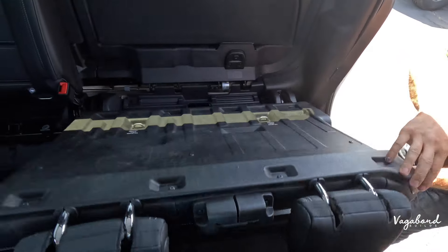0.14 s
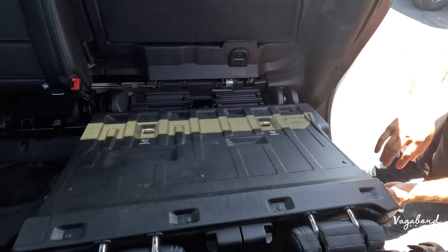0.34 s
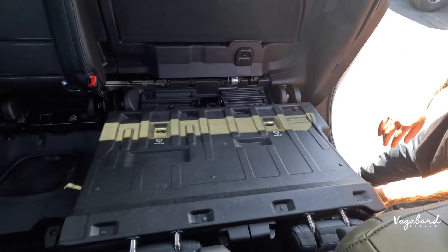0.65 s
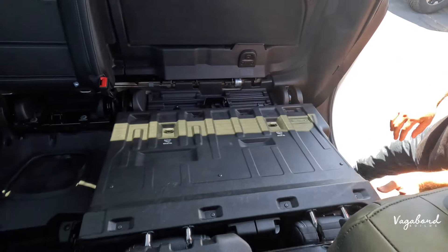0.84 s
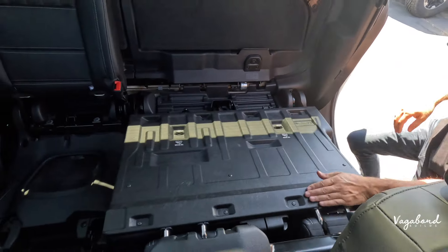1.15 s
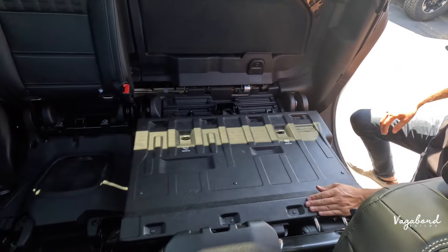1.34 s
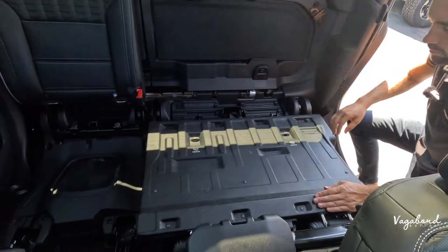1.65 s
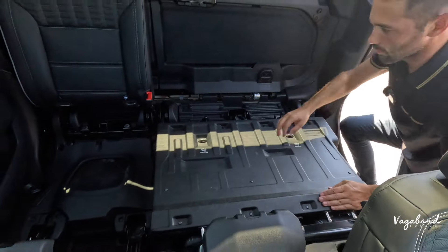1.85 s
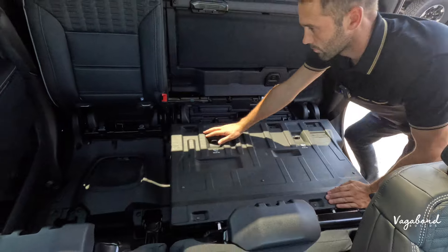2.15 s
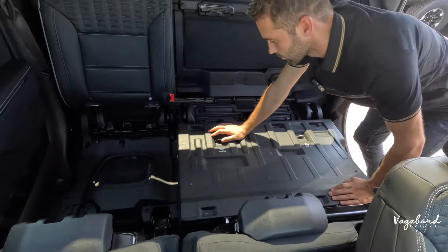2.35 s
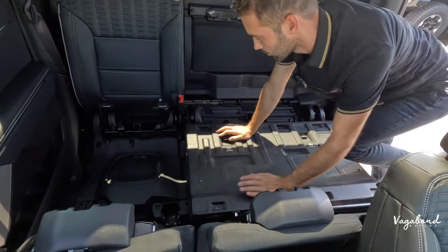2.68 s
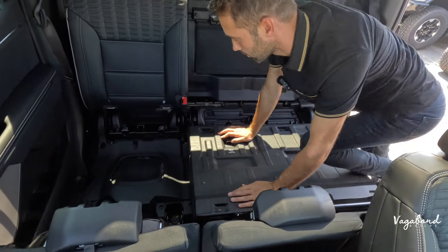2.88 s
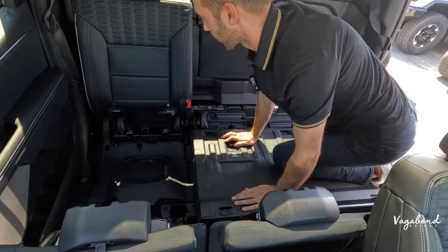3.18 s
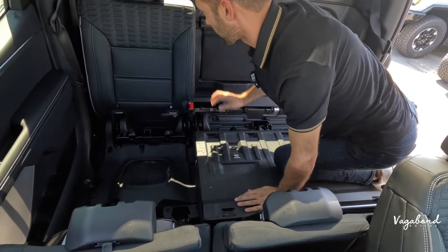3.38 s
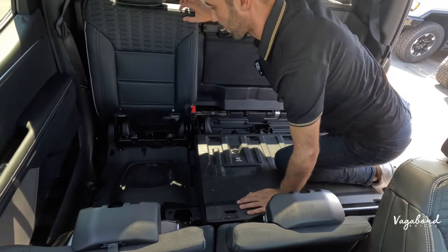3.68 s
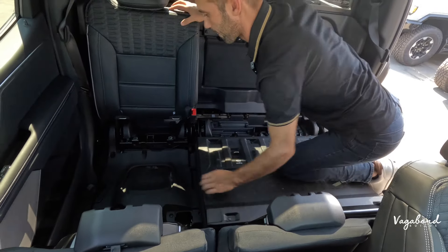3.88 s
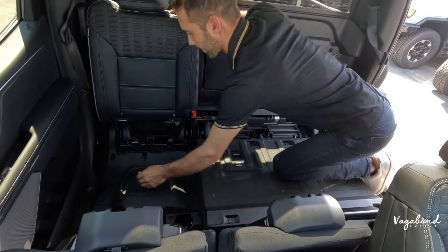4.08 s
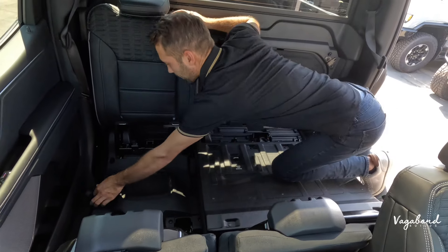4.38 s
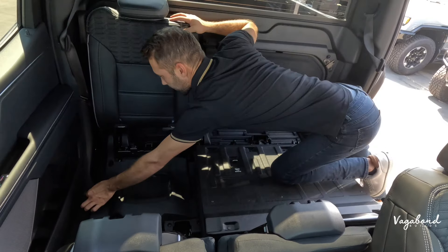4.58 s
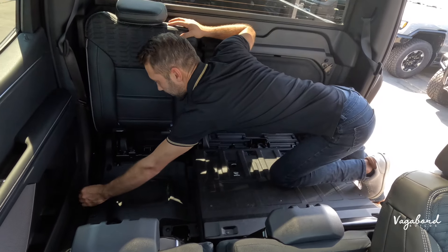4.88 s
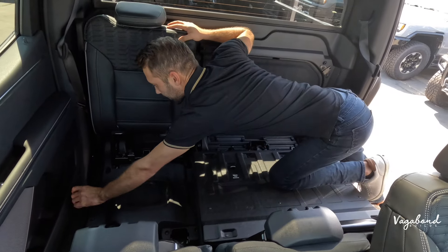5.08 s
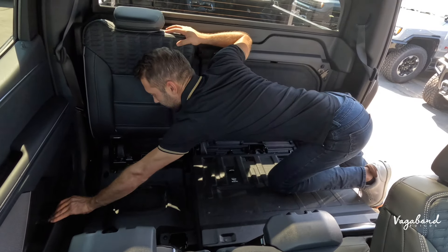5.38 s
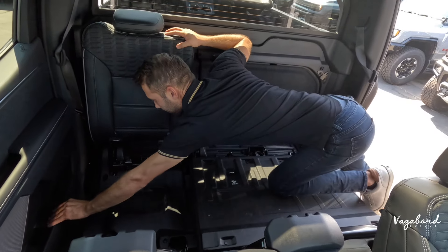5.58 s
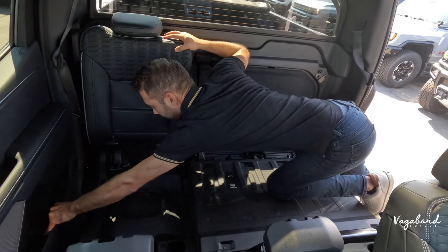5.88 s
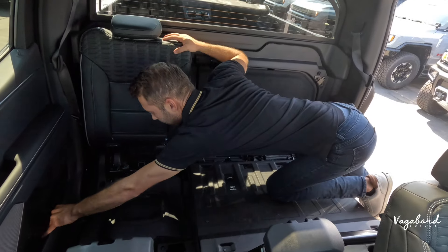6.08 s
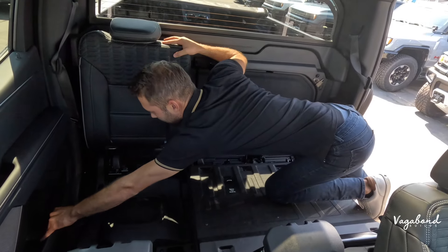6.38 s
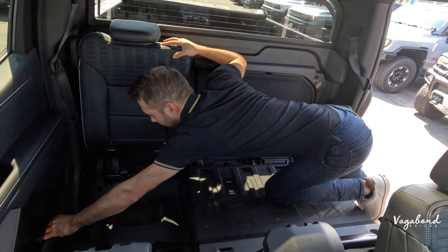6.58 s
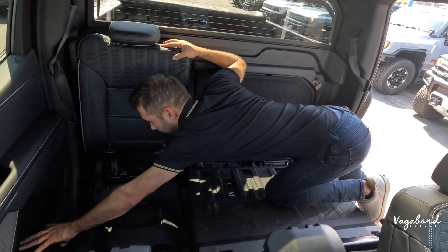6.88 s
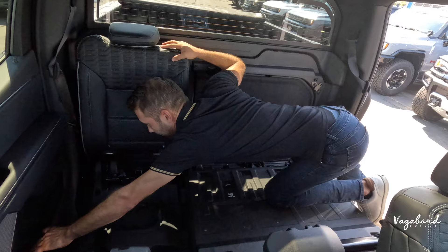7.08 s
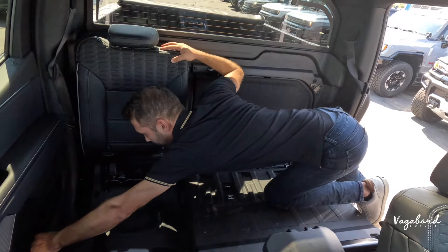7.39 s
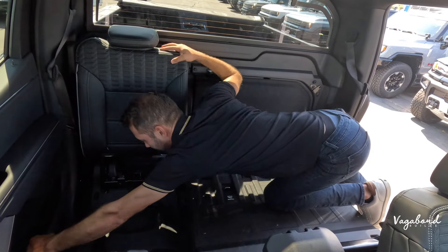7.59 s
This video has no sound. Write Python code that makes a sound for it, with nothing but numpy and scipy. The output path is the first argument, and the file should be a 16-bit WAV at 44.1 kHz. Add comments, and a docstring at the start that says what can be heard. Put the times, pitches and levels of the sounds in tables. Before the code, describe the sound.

A close, dry, nearly mono scene in a small padded truck cab, with a very faint outdoor hush and machinery drone through an open door. From 0 to 0.6 s, airy brushing, small clicks and soft panel thuds; then near quiet until a sharp knock at 1.1 s with light taps behind it. A heavier, humming thump lands at 1.6 s and another at 2.2. A bright scrape and crisp snap come around 2.5, followed by knocks and a deep soft boom near 3.1. Hollow thumps and cloth rustle continue to 4.3 s, then mostly quiet until 5.2. From 5.4 to 6.5 s, dense hollow knocking, plastic clacks and rattling clips. Short rubbing creaks at 6.6 to 6.8 lead to a hard clattering blow at 6.9, a strong knock at 7.27, and final thumps with rustling to about 7.7.

```python
"""Brushing, thumps, snaps and clatter, as a folding rear seat is laid flat and climbed on in a parked truck cab.
Hands and knees thump the seat back: panel, frame and trim modes, band-limited around each blow's pitch.
Upholstery and clothes brush over plastic: noise made of uneven slips; latch parts snap and loose parts rattle.
The small padded cab answers briefly; a faint outdoor hush and drone come through one open door. Almost mono."""
import sys
import numpy as np
from scipy import signal
from scipy.fft import rfft, irfft
from scipy.io import wavfile
from scipy.ndimage import uniform_filter1d

SR = 44100
rng = np.random.default_rng(int(sys.argv[2]) if len(sys.argv) > 2 else 0)


def to_wav(sig):
    """Store sig (one row per channel, or 1-D mono) as 16-bit WAV at the path in sys.argv[1].

    Samples outside -1..1 are clipped; the rate is SR.
    """
    pcm = np.clip(np.atleast_2d(sig), -1, 1) * 32767
    pcm = np.round(pcm).astype(np.int16)
    wavfile.write(sys.argv[1], SR, pcm.T)  # frames by channels


N = 341334
TIME_S = np.arange(N) / SR
RING_S = np.arange(SR // 4) / SR  # time since a blow
TOP_HZ = 15900

# blows on seat back and trim: (time [s], panel level before trim [dB], panel pitch [Hz], settling time [s],
# frame thud level before trim [dB], contact clack level [dB], clack pitch [Hz])
BLOWS = [(0.264, -32, 277, 0.48, -36, -61, 1000), (0.36, -36, 300, 0.28, -37.5, -57, 1000),
         (0.539, -49, 332, 0.14, -45.5, -66, 1200), (1.12, -25.5, 567, 0.12, -44, -33, 1380),
         (1.127, -29.5, 304, 0.25, -42, -37.5, 1930), (1.228, -45, 520, .07, -57, -54, 1640),
         (1.26, -45, 520, 0.048, -55, -65, 1400), (1.282, -37.5, 524, 0.099, -37.5, -37.5, 1370),
         (1.302, -34.5, 556, 0.09, -45, -58, 1390), (1.322, -35, 519, 0.089, -41, -51, 1480),
         (1.338, -34, 396, 0.37, -41, -54, 1570), (1.404, -42.5, 332, 0.17, -39.5, -53, 1400),
         (1.609, -28, 483, 0.11, -33, -38.5, 1790), (1.626, -23.5, 320, .2, -33, -48.5, 1720),
         (1.687, -37.5, 523, 0.21, -30.5, -61, 900), (1.762, -40, 574, 0.064, -43, -47, 1290),
         (1.789, -48, 523.7, 0.038, -66, -53, 1290), (2.008, -36, 215, 0.16, -38.5, -47.5, 2400),
         (2.181, -23, 305, 0.1, -25, -54, 1760), (2.211, -32.5, 353, 0.25, -34, -38, 1850),
         (2.519, -30.5, 366, 0.071, -43.5, -58, 990), (2.76, -32, 348, 0.23, -42, -43.5, 1520),
         (2.797, -51, 400, .04, -59, -44.5, 1490), (2.817, -38.5, 250, 0.049, -41, -69, 1000),
         (2.895, -29, 336, 0.13, -43, -52, 1350), (2.922, -31, 306, 0.21, -41, -52, 1500),
         (2.953, -37, 396, 0.053, -52, -48, 1720), (3.129, -23, 378, 0.2, -32, -32.5, 1560),
         (3.16, -31.5, 430, 0.081, -42, -37, 1695), (3.548, -38, 350, 0.2, -45, -62, 1490),
         (3.586, -40.5, 520, 0.09, -62, -47.5, 1340), (3.661, -42, 623, 0.22, -51, -57, 1300),
         (3.689, -45.5, 600, 0.16, -60, -40.5, 2130), (3.761, -33, 500, 0.16, -36.5, -40, 1800),
         (3.903, -29, 375, 0.34, -33, -53, 1190), (3.924, -24, 340, 0.049, -38.5, -35, 1410),
         (4.218, -32.5, 416, 0.16, -51, -43, 1330), (4.313, -48, 345, 0.023, -55.5, -39, 1770),
         (4.462, -35, 303, 0.1, -41, -72, 890), (4.529, -42.5, 253, 0.0547, -48.5, -56, 1410),
         (5.177, -46, 378, 0.134, -53.5, -80, 900), (5.346, -38, 237, 0.13, -31.5, -63.5, 1010),
         (5.43, -36, 503, 0.85, -47, -43.5, 1380), (5.471, -27.5, 553, 0.091, -44, -23.5, 1340),
         (5.48, -24.5, 404, 0.063, -42, -30.5, 1940), (5.628, -26, 653, 0.55, -36, -39.5, 1130),
         (5.669, -25, 530, 0.035, -34, -36, 1387), (5.686, -19.5, 416, 0.03, -25.5, -36.5, 1390),
         (5.745, -34, 363, 0.21, -31, -43, 2030), (5.81, -33.5, 434, 0.23, -38.5, -48, 1490),
         (5.908, -21, 435, 0.14, -40, -79, 900), (5.938, -32, 507, 0.088, -48, -68, 900),
         (5.965, -32.5, 534, 0.12, -58, -54, 910), (6.082, -30, 503, 0.12, -61, -44.5, 1210),
         (6.123, -24, 440, 0.12, -51, -25.5, 1280), (6.133, -22, 440, 0.11, -34, -31, 1280),
         (6.174, -33, 482, 0.057, -40, -38, 1500), (6.183, -22.5, 330, 0.18, -35, -49, 1370),
         (6.229, -25.5, 340, 0.047, -28.5, -44, 1380), (6.244, -25.5, 378, 0.036, -37, -46, 1500),
         (6.297, -28.5, 362, 0.28, -37.5, -47, 1400), (6.323, -29, 425, 0.12, -36, -42, 1500),
         (6.349, -25, 420, 0.088, -32, -38, 1440), (6.365, -28, 376, 0.069, -31, -59, 1190),
         (6.459, -28.5, 372, 0.074, -39.5, -41, 1500), (6.468, -20.5, 360, 0.068, -29, -39.5, 1490),
         (6.486, -33, 292, 0.17, -34, -46, 1630), (6.58, -36.5, 495, 0.37, -60, -66, 910),
         (6.871, -22, 440, 0.35, -27, -30, 1000), (6.896, -16, 500, 0.071, -39, -31, 1450),
         (6.909, -15, 550, 0.028, -34, -22, 1680), (6.917, -38, 560, 0.037, -49, -22.5, 1360),
         (6.943, -36.5, 565, 0.34, -42, -57, 1200), (7.015, -34.5, 308, 0.053, -40.5, -48, 1110),
         (7.066, -34, 616, 0.082, -64, -75, 910), (7.209, -27.5, 474, 0.15, -32.5, -46.5, 1130),
         (7.267, -11, 570, 0.037, -26.5, -30.5, 1210), (7.278, -21, 503, 0.08, -28, -41, 1530),
         (7.394, -20.5, 425, 0.09, -33.5, -41, 1290), (7.57, -24.5, 330, 0.11, -35, -34, 1250),
         (7.591, -40.5, 396, 0.11, -51, -40.5, 1320)]
# modes of the latch parts: (frequency [Hz], level [dB])
LATCH_MODES = [(2330, 13), (2600, 8), (2857, 8), (3227, 5.5), (3396, 7), (3700, 0), (3950, 1), (4350, -11),
               (4567, -9.5), (5000, -16), (6215, -26), (6690, -8.5), (7200, 4.5), (8170, 3), (8380, -8),
               (9800, 4.5)]
# rustle of clothes: (time [s], level before trims [dB])
RUSTLE_LEVEL = [(0.0, -53), (0.21, -53.5), (0.95, -55.5), (1.55, -51), (1.7, -58.5), (1.85, -55),
                (2.4, -54), (2.68, -62), (3.02, -54.5), (3.23, -47.5), (3.36, -52.5), (3.52, -61),
                (3.72, -51), (3.8, -44), (4.98, -67), (5.37, -67), (5.53, -45), (5.6, -62), (5.85, -50.5),
                (6.02, -58), (6.2, -44), (6.42, -63.5), (6.5, -54), (6.62, -56.5), (6.85, -59),
                (6.98, -61.5), (7.3, -51.5), (7.45, -56.5), (7.61, -50), (7.645, -44.5), (7.69, -50),
                (7.74, -43)]


def undb(db):
    """Decibels to gain."""
    return 10 ** (np.asarray(db) / 20)


def unit(x):
    """Scale to rms 1."""
    return x / np.sqrt(np.mean(x ** 2) + 1e-20)


def blow_level(x, db):
    """Give a short sound the energy of 20 ms at this rms level."""
    return x * undb(db) * np.sqrt(0.02 * SR / np.sum(x ** 2))


def fade(t60_s):
    """Exponential decay after a blow, 60 dB in t60_s."""
    return np.exp(-np.log(1000) * RING_S / max(t60_s, 1e-3))


def press(contact_s):
    """Force builds over the time that a contact takes."""
    contact_s = max(contact_s, 1e-5)
    force = np.ones(len(RING_S))
    t = RING_S[:int(5 * contact_s * SR) + 1]
    force[:len(t)] -= np.exp(-(t / contact_s) ** 2)
    return force


def band(x, low_hz, high_hz, order=2):
    """Causal band-pass."""
    high_hz = np.clip(high_hz, 50, 0.45 * SR)
    low_hz = np.clip(low_hz, 10, 0.96 * high_hz)
    return signal.sosfilt(signal.butter(order, [low_hz, high_hz], "band", fs=SR, output="sos"), x)


def colour(x, points):
    """Shape a long sound's spectrum by (Hz, dB) points; rms 1."""
    hz, db = np.transpose(points)
    f = np.maximum(np.arange(N // 2 + 1) * SR / N, 1)
    gain = undb(np.interp(np.log(f), np.log(hz), db))
    return unit(irfft(rfft(x) * gain, N))


def curve(rows):
    """(s, dB) rows as gain over time."""
    return undb(np.interp(TIME_S, *np.transpose(rows)))


def walk(rate_hz):
    """Smooth random wander, rms 1."""
    k = max(int(SR / rate_hz), 1)
    steps = np.repeat(rng.standard_normal(N // k + 1), k)
    return unit(uniform_filter1d(steps, k)[:N])


def add(out, s, x):
    """Mix x into out from time s on."""
    i = int(np.clip(s * SR, 0, N - 1))
    out[i:i + len(x)] += x[:N - i]


def friction(grain_db, jerk_db, jerk_rate_hz):
    """Countless tiny slips of uneven size, coming in jerks."""
    slips = rng.standard_normal(N) * undb(grain_db * rng.exponential(size=N))
    return unit(slips * undb(jerk_db * walk(jerk_rate_hz)))


def cupped(x, gap_s=0.000604, wander=0.5):
    """Gaps under a moving hand give very short echoes of changing delay, so the colour shifts in patches."""
    out = x
    for _ in range(4):
        at = np.arange(N) - gap_s * SR * np.exp(wander * walk(35))
        out = out + 0.3 * walk(25) * np.interp(at, np.arange(N), x)
    return unit(out)


def struck(modes, t60_s, chatter_db, contact_s, detune=0.017):
    """A part rings in its modes, a little differently at each spot, while loose joints chatter along."""
    hz, db = np.transpose(modes)
    t = RING_S[:int(np.clip(1.5 * t60_s * SR, 500, len(RING_S)))]
    hz = hz * (1 + detune * rng.standard_normal(len(hz)))
    size = undb(db) * rng.choice([-1, 1], len(hz))
    waves = np.sin(np.outer(np.float32(2 * np.pi * hz), np.float32(t)))
    out = undb(chatter_db) * rng.standard_normal(len(RING_S))
    out[:len(t)] += unit(size.astype(np.float32) @ waves)
    return out * fade(t60_s) * press(contact_s)


def bouncing(modes, t60_s, settle_s, delays_s, chatter_db, contact_s):
    """A part struck once per delay, weaker by 60 dB for each settling time elapsed."""
    out = np.zeros(len(RING_S))
    for after_s in delays_s:
        i = int(np.clip(after_s * SR, 0, len(RING_S) - 1))
        size = np.exp(-np.log(1000) * after_s / max(settle_s, 1e-3))
        out[i:] += size * struck(modes, t60_s, chatter_db, contact_s)[:len(RING_S) - i]
    return out


def spot(x, shortest_s=0.0003, longest_s=0.0011, reflection=0.43):
    """The nearest rim sends a blow back after a short delay, so each spot favours its own resonances."""
    lag = max(int(SR * rng.uniform(shortest_s, longest_s)), 1)
    back = np.zeros(lag + 1)
    back[0] = 1
    back[lag] = min(reflection, 0.8) * rng.choice([-1, 1])
    return signal.lfilter([1], back, x)


def tick(hz, width, t60_s):
    """A small part touches once and rings around one pitch; width is a share of the pitch."""
    size = int(0.03 * SR)
    peak = signal.iirpeak(min(hz, 0.4 * SR), 1 / width, fs=SR)
    burst = rng.standard_normal(size) * fade(t60_s)[:size]
    return signal.lfilter(*peak, signal.lfilter(*peak, burst))


def crack(t60_s, later_slips=2, slip_delay_s=0.0035, slip_db=-1):
    """A catch lets go with a dry burst, and slips twice more within a few milliseconds."""
    burst = fade(t60_s) * press(contact_s=0.0012)
    force = burst.copy()
    for after_s in slip_delay_s * rng.uniform(0.64, 1.3, later_slips):
        force += undb(slip_db) * np.interp(RING_S - after_s, RING_S, burst, left=0)
    return force * rng.standard_normal(len(RING_S))


def outside(hush_db=-64.5):
    """Distant hush (shaped noise) and machinery drone (narrow noise bands) through the open door."""
    # hush spectrum: (frequency [Hz], relative level [dB])
    hush_colour = [(25, -20.5), (60, -10.5), (125, -2.5), (200, -24.5), (290, -3), (440, -1.5), (620, -2.5),
                   (790, -19), (1000, -13), (1600, -14.5), (3000, -18.5), (6000, -35.5), (10000, -34.5),
                   (16000, -53)]
    # machinery drone: (centre [Hz], width [Hz], level [dB])
    drone_bands = [(290.5, 12.4, -66), (783, 27, -69.5)]
    swell = undb(0.7 * walk(3))
    out = undb(hush_db) * colour(rng.standard_normal(N), hush_colour)
    for hz, width_hz, db in drone_bands:
        out += undb(db) * unit(band(rng.standard_normal(N), hz - width_hz / 2, hz + width_hz / 2))
    return out * swell


def movement(rustle_trim_db=-3, shifting_trim_db=-4, sway_db=-10.5, sway_rise_s=0.035, sway_fall_s=0.042):
    """Clothes rustle and the seat rubs softly under a moving body, more so as it sways after each thud."""
    # spectra: (frequency [Hz], relative level [dB])
    rustle_colour = [(800, 16), (1400, 7), (3000, 5), (5000, 0), (7500, -2), (10000, -11.5), (13000, -11),
                     (16000, -32)]
    shifting_colour = [(30, -33), (60, -8.5), (120, 0.5), (280, 5), (420, 1), (620, -5), (790, 0),
                       (1000, -15), (1700, -14.5), (3000, -54)]
    # low rubbing of a body on the seat: (time [s], level before trim [dB])
    shifting_level = [(0.0, -91), (1.12, -52), (1.29, -33.5), (1.46, -51.5), (1.89, -42), (2.76, -51.5),
                      (2.98, -44), (3.41, -67), (3.9, -57), (4.16, -46), (4.98, -55.5), (5.39, -71),
                      (5.54, -37), (5.78, -56), (6.01, -49), (6.32, -47), (6.7, -44.5), (7.74, -42.5)]
    rustle = colour(friction(grain_db=1.5, jerk_db=1.5, jerk_rate_hz=40), rustle_colour)
    rubbing = colour(friction(grain_db=2, jerk_db=1.8, jerk_rate_hz=35), shifting_colour)
    sway = np.zeros(N)
    sway_shape = press(sway_rise_s) * np.exp(-RING_S / sway_fall_s)
    for s, _, _, _, thud_db, _, _ in BLOWS:
        add(sway, s, undb(thud_db + sway_db) * sway_shape)
    rub_level = np.hypot(undb(shifting_trim_db) * curve(shifting_level), sway)
    return undb(rustle_trim_db) * curve(RUSTLE_LEVEL) * rustle + rub_level * rubbing


def crinkles(width=0.7, t60_s=0.008, count=420, quietest_db=-18.5, mean_rise_db=3.5, low_hz=2470, high_hz=9100):
    """Creases in cloth and upholstery tick at random moments, following the rustle level."""
    out = np.zeros(N)
    for when, pitch, size in rng.random((count, 3)):
        hz = low_hz * (high_hz / low_hz) ** pitch
        db = quietest_db - mean_rise_db * np.log(1 - size)  # level against the rustle
        add(out, when * N / SR, blow_level(tick(hz, width, t60_s), db))
    return out * curve(RUSTLE_LEVEL)


def drags(trim_db=1, slip_scatter_db=3, smooth_db=-24, echo_gain=0.31, echo_cycles=4.06):
    """Slips of uneven size feed one gliding resonance with a short echo that glides along."""
    # parts dragged under pressure, and two deep soft booms at 3.1 and 4.2 s: (start [s], end [s],
    # level before trim [dB], start pitch [Hz], end pitch [Hz], width [Hz], slip rate [1/s])
    drag_rows = [(-.03, 0.09, -43.5, 7700, 8510, 3050, 3300), (0.08, 0.15, -43.5, 7200, 8350, 3200, 1700),
                 (0.164, 0.197, -34.5, 6950, 6300, 1500, 930), (0.167, 0.324, -52, 7300, 5400, 3800, 460),
                 (0.217, 0.277, -51.5, 3800, 3320, 1300, 370), (0.338, 0.469, -40.5, 5600, 4730, 2300, 520),
                 (1.008, 1.146, -55, 1410, 1860, 700, 510), (1.29, 1.36, -53, 3100, 2850, 1200, 94),
                 (1.337, 1.53, -55.5, 1630, 1400, 700, 280), (1.779, 1.932, -54, 7340, 6300, 2600, 350),
                 (1.996, 2.15, -56.5, 3580, 4340, 1500, 340), (2.324, 2.35, -48.5, 5040, 4340, 1190, 2000),
                 (2.466, 2.615, -37, 2350, 2160, 800, 2350), (2.833, 3.138, -55.5, 1360, 2550, 1260, 2000),
                 (3.104, 3.215, -43, 72, 58, 40, 350), (3.605, 3.712, -48, 6100, 5200, 1900, 770),
                 (4.2, 4.32, -46, 65, 60, 40, 970), (5.468, 5.487, -27, 4350, 4150, 714, 1340),
                 (6.232, 6.245, -34.5, 2170, 1660, 600, 910), (6.302, 6.332, -47, 2800, 2400, 913, 490),
                 (6.453, 6.526, -57, 4150, 4500, 900, 900), (6.568, 6.62, -31.5, 530, 630, 131, 1600),
                 (6.688, 6.707, -33, 1080, 816, 250, 1200), (6.699, 6.719, -27, 566, 610, 70, 1100),
                 (6.707, 6.74, -33.5, 785, 1060, 140, 900), (6.718, 6.757, -38.5, 720, 635, 100, 730),
                 (6.684, 6.722, -44, 3260, 3420, 300, 880), (6.686, 6.74, -42.5, 4800, 5030, 3000, 1000),
                 (6.752, 6.792, -40, 1290, 1640, 330, 500), (6.741, 6.88, -48.5, 1930, 2480, 450, 270),
                 (6.781, 6.869, -49, 1100, 1480, 330, 500), (6.75, 6.89, -46, 3860, 4630, 2550, 510),
                 (6.898, 6.932, -11, 533, 563, 71, 2500), (7.259, 7.286, -23, 746, 650, 380, 1200),
                 (7.277, 7.288, -32, 1700, 2000, 900, 1300), (3.932, 4.21, -63, 4200, 4700, 1400, 1200),
                 (7.556, 7.587, -40.5, 2360, 1960, 1300, 980)]
    out = np.zeros(N)
    for start, end, db, start_hz, end_hz, width_hz, slips_per_s in drag_rows:
        on = (TIME_S >= start) & (TIME_S < end)
        stroke = (TIME_S[on] - start) / (end - start)
        happens = rng.random(len(stroke)) < slips_per_s / SR
        size, hiss = rng.standard_normal((2, len(stroke)))
        slips = happens * np.sign(size) * undb(slip_scatter_db * np.abs(size)) + undb(smooth_db) * hiss
        phase = 2 * np.pi * np.cumsum(start_hz + (end_hz - start_hz) * stroke) / SR
        # shift the pitch to 0 Hz, low-pass, shift back: a band-pass that glides
        narrow = signal.butter(2, width_hz / 2, fs=SR, output="sos")
        rub = np.real(signal.sosfilt(narrow, slips * np.exp(-1j * phase)) * np.exp(1j * phase))
        rub = rub + echo_gain * np.interp(phase - 2 * np.pi * echo_cycles, phase, rub)
        out[on] += undb(db + trim_db) * unit(rub) * np.sin(np.pi * stroke)
    return out


def scrapes(start_db=-20, end_db=-25, bend=1.1, trim_db=2, fibre_db=-19, rise_share=0.3):
    """Each stroke speeds up and dies away; its slips tick in plastic that rings differently at each place."""
    # cloth, skin and sliding parts on plastic: (start [s], length [s], level before trim [dB],
    # low edge [Hz], high edge [Hz])
    stroke_rows = [(0.142, 0.26, -37, 4460, 8800), (0.437, 0.69, -53, 4100, 9900),
                   (1.117, 0.1, -39.5, 1830, 10500), (1.183, 0.34, -48, 1300, 11300),
                   (1.233, 0.29, -45.5, 300, 1900), (1.927, 0.11, -37, 298, 1240),
                   (1.935, 0.19, -49, 2470, 8500), (2.176, 0.11, -37, 1670, 8750),
                   (2.432, 0.12, -34.5, 4200, 9500), (2.465, 0.17, -26.5, 2580, 10200),
                   (2.558, 0.06, -32, 8700, 13800), (2.722, 0.12, -34.5, 2630, 10200),
                   (2.84, 0.13, -38, 220, 1430), (2.846, 0.061, -32, 2260, 9700),
                   (2.896, .09, -48, 2000, 9600), (3.115, 0.069, -37, 600, 5960),
                   (3.169, 0.099, -45, 1200, 7440), (3.274, 0.095, -42.5, 1570, 4530),
                   (3.542, 0.092, -40.5, 3070, 10700), (3.741, 0.15, -38, 2064, 10880),
                   (3.902, 0.045, -34, 1500, 9000), (4.213, 0.025, -34.5, 2380, 3800),
                   (5.37, 0.076, -52.5, 3900, 6150), (5.623, 0.19, -40, 700, 1800),
                   (5.628, 0.054, -51, 3400, 4900), (5.465, 0.028, -37, 7250, 12900),
                   (5.757, 0.12, -45.5, 1600, 9100), (6.068, 0.03, -45.5, 1200, 4750),
                   (6.143, 0.086, -46.5, 4340, 14500), (6.124, 0.24, -47, 895, 2230),
                   (6.458, 0.084, -44.5, 1290, 4520), (6.894, 0.04, -21, 1150, 4200),
                   (6.953, 0.15, -46.5, 600, 2040), (7.088, 0.061, -47, 1140, 2100),
                   (7.236, 0.091, -45, 2800, 4800), (7.502, 0.08, -53, 3000, 7600)]
    out = np.zeros(N)
    slips = cupped(friction(grain_db=1.9, jerk_db=1.6, jerk_rate_hz=130))
    for start, length, db, low_hz, high_hz in stroke_rows:
        on = (TIME_S >= start) & (TIME_S < start + length)
        stroke = (TIME_S[on] - start) / length
        before = np.clip(1 - stroke / rise_share, 0, 1)
        after = np.clip((stroke - rise_share) / (1 - rise_share), 0, 1)
        speed = undb(db + trim_db + start_db * before ** bend + end_db * after ** bend)
        plastic = struck(LATCH_MODES, t60_s=0.025, chatter_db=6, contact_s=0.0002, detune=0.05)
        plastic = blow_level(plastic, -41)
        ticks = slips[on] + signal.fftconvolve(slips[on], plastic)[:len(stroke)]
        rub = unit(band(ticks, low_hz, high_hz, order=3))
        # the finest fibres hiss just above the stroke
        fibres = unit(band(ticks, high_hz, 1.6 * high_hz, order=3))
        out[on] += speed * (rub + undb(fibre_db) * fibres)
    return out


def clicks(crack_db=2, crack_t60_s=0.0064, ring_t60_s=0.038, trim_db=1, sizzle_db=-25, graze_db=-24,
           graze_s=0.018, spread=1.545, jolt_db=-17, jolt_ratio=2.3):
    """An edge grazes along its catch, lets go with a crack and rings briefly; every clack sets one off too."""
    # snaps of catches and plastic edges: (time [s], level before trim [dB], pitch [Hz])
    snap_rows = [(0.169, -39.5, 6060), (0.271, -41.5, 5860), (0.399, -57, 4830), (0.541, -41.5, 6000),
                 (0.936, -53.5, 5340), (1.124, -32.5, 6160), (1.608, -42.5, 5160), (1.956, -44, 6000),
                 (2.176, -39, 4800), (2.58, -23.5, 4900), (2.763, -33.5, 6940), (2.845, -46, 5150),
                 (2.921, -57, 5500), (3.053, -51.5, 2560), (3.129, -36, 4000), (3.163, -39.5, 4370),
                 (3.195, -36, 5300), (3.201, -40.5, 4600), (3.584, -42, 6000), (3.663, -44.5, 5900),
                 (3.756, -41, 4830), (4.314, -44, 4670), (4.492, -44.5, 4600), (5.427, -49, 4600),
                 (5.471, -32.5, 4100), (5.518, -47, 7250), (5.559, -52, 4040), (5.681, -41.5, 4780),
                 (5.747, -39, 3630), (5.919, -46.5, 6000), (6.122, -33, 3180), (6.178, -54, 5100),
                 (6.245, -44.5, 4600), (6.315, -49, 3340), (6.659, -47.5, 4870), (6.745, -41.5, 3970),
                 (6.794, -45, 4560), (6.909, -29.5, 4350), (7.166, -52, 6060), (7.28, -42, 5000),
                 (7.507, -52, 3000), (7.555, -49.5, 5800), (7.623, -42, 3200), (7.629, -47, 5060),
                 (7.72, -56, 5360)]
    out = np.zeros(N)
    lead = int(0.02 * SR)  # graze before the crack
    jolts = [(s, clack_db + jolt_db, jolt_ratio * clack_hz) for s, _, _, _, _, clack_db, clack_hz in BLOWS]
    for s, db, hz in snap_rows + jolts:
        swelling = np.exp(-RING_S[:lead] / graze_s)[::-1]
        graze = undb(graze_db) * rng.standard_normal(lead) * swelling
        ring = struck(LATCH_MODES, ring_t60_s, chatter_db=6, contact_s=0.0012, detune=0.004) / 2
        release = spot(undb(crack_db) * crack(crack_t60_s) + ring, reflection=0.3)
        snap = np.concatenate([graze, release])
        sizzle = band(snap, low_hz=6780, high_hz=14600)
        snap = band(snap, hz / spread, hz * spread, order=3) + undb(sizzle_db) * sizzle
        add(out, s - lead / SR, blow_level(snap, db + trim_db))
    return out


def rattles(base_db=-16, mean_delay_s=0.034, low_hz=1040, high_hz=5260, fall_db_per_s=200,
            tilt_db_per_oct=-5, scatter_db=2, count=7):
    """Every blow shakes loose clips and buckles; each ticks at its own pitch, softer the later on average."""
    out = np.zeros(N)
    for s, db, _, _, _, clack_db, _ in BLOWS:
        for _ in range(count):
            after_s = mean_delay_s * rng.exponential()
            octaves = rng.random() * np.log2(high_hz / low_hz)
            tick_db = (db + clack_db) / 2 + base_db - fall_db_per_s * after_s + tilt_db_per_oct * octaves
            tick_db += scatter_db * rng.standard_normal()
            part = tick(low_hz * 2 ** octaves, width=0.55, t60_s=0.01)
            add(out, s + after_s, blow_level(part, tick_db))
    return out


def booms(second_ratio=2.0, second_db=-13, waver_db=7.0, sag=0.052, sag_s=0.039):
    """The pressed seat back hums in a low mode and a weaker one above; it starts sharp, relaxes and wavers."""
    # heavy presses: (time [s], level [dB], settled pitch [Hz], swell time [s], ring t60 [s])
    boom_rows = [(1.61, -27, 277.2, 0.0102, 0.53), (2.759, -28, 262, 0.004, .11),
                 (3.107, -25, 133, 0.021, 0.085), (3.906, -24.5, 337, 0.0072, 0.16),
                 (6.35, -32.5, 215, 0.0122, .24)]
    out = np.zeros(N)
    t = TIME_S[:SR]
    for s, db, hz, swell_s, t60_s in boom_rows:
        phase = 2 * np.pi * np.cumsum(hz * (1 + sag * np.exp(-t / sag_s))) / SR
        hum = np.sin(phase) + undb(second_db) * np.sin(second_ratio * phase)
        shape = (1 - np.exp(-(t / swell_s) ** 2)) * np.exp(-np.log(1000) * t / t60_s)
        waver = undb(waver_db * walk(55)[:SR])
        add(out, s, blow_level(hum * shape * waver, db))
    return out


def knocks(spread=1.438, free_t60_s=0.41, frame_t60_s=0.15, panel_trim_db=0.5, thud_trim_db=1.5,
           clack_t60_share=0.42, clack_settle_share=0.67, clack_spread=1.395, thud_lag_s=0.0018,
           rebound_s=0.029, rebound_scatter=0.25):
    """A blow clacks, rings the panel and shakes the frame; it rebounds twice, weaker; the clack repeats once."""
    # modes of moulded panels, seat frame with floor, stiff trim edges: (frequency [Hz], level [dB])
    panel_modes = [(220, 7), (265, 0), (300, 1), (352, 0), (398, -1.5), (428, 0), (479, 0.5), (542, 2),
                   (575, 2), (657, 1.5), (705, 0), (775, 2.5), (900, 1), (975, -3)]
    frame_modes = [(68, -4.5), (97, -36), (116, -14.5), (135, -0.5), (165, -1), (198, 4)]
    trim_modes = [(830, 15), (985, 8.5), (1190, 5.5), (1265, 3), (1400, 3.5), (1550, -1.5), (1675, 2),
                  (1790, -2.5), (1960, 0), (2100, -5), (2310, -3.5), (2595, 5), (2857, -2.5)]
    out = np.zeros(N)
    for s, db, hz, settle_s, thud_db, clack_db, clack_hz in BLOWS:
        t60_s = 1 / (1 / settle_s + 1 / free_t60_s)  # contact damping on top of the free ring
        delays_s = np.arange(3) * rebound_s * (1 + rebound_scatter * rng.standard_normal(3))
        panel = bouncing(panel_modes, t60_s, settle_s, delays_s, chatter_db=0, contact_s=0.0008)
        panel = band(panel, hz / spread, hz * spread)
        frame = bouncing(frame_modes, frame_t60_s, settle_s, delays_s, chatter_db=22.5, contact_s=0.0033)
        frame = band(frame, low_hz=83, high_hz=270, order=3)
        edge = bouncing(trim_modes, t60_s * clack_t60_share, settle_s * clack_settle_share, delays_s[:2],
                        chatter_db=-2, contact_s=0.0012)
        edge = band(spot(edge), clack_hz / clack_spread, clack_hz * clack_spread, order=3)
        add(out, s, blow_level(panel, db + panel_trim_db) + blow_level(edge, clack_db))
        add(out, s + thud_lag_s, blow_level(frame, thud_db + thud_trim_db))
    return out


def cab(x, low_t60_s=0.011, high_t60_s=0.12, split_hz=900, build_s=0.00022):
    """Dense short reflections of the padded cab, with one decay for the lows and one for the highs."""
    noise = rng.standard_normal(len(RING_S))
    lows = band(noise, 41, split_hz) * fade(low_t60_s)
    highs = band(noise, split_hz, TOP_HZ) * fade(high_t60_s)
    echo = (lows + highs) * press(build_s)
    return signal.fftconvolve(x, echo / np.sqrt(np.sum(echo ** 2)))[:N]


def scene(cab_db=-12, side_db=-35, side_low_db=-28, side_treble_db=-22):
    """Nearly mono; a faint difference between the channels, with its own level in lows and treble."""
    handling = movement() + crinkles() + drags() + scrapes() + clicks() + rattles() + booms() + knocks()
    mid = outside() + handling + undb(cab_db) * cab(handling)
    diffuse = cab(handling)
    side = undb(side_db) * diffuse
    side += undb(side_low_db) * band(diffuse, low_hz=131, high_hz=600)
    side += undb(side_treble_db) * band(diffuse, low_hz=10000, high_hz=16000)
    return np.array([mid + side, mid - side])


def record(dry, rumble_hz=50):
    """Drop the deepest rumble, round the tallest peaks and cut the top."""
    x = signal.sosfilt(signal.butter(2, rumble_hz, "high", fs=SR, output="sos"), dry)
    return signal.sosfilt(signal.ellip(8, 0.2, 70, TOP_HZ, fs=SR, output="sos"), np.tanh(x))


dry = scene()
out = record(dry)
to_wav(out)
```